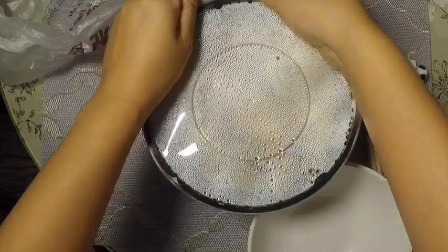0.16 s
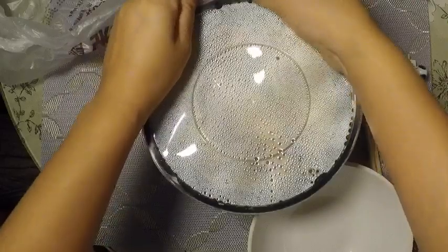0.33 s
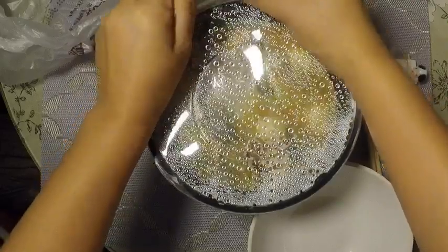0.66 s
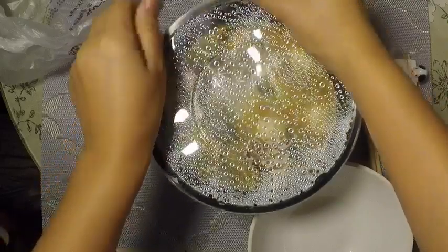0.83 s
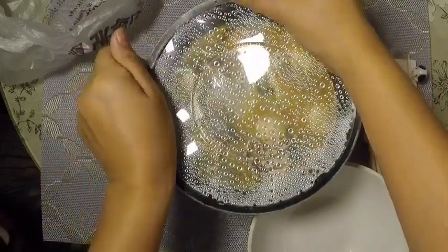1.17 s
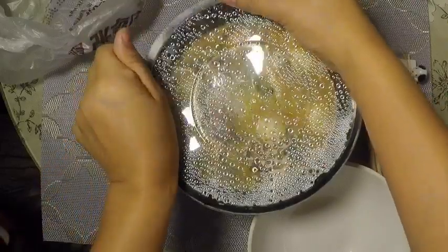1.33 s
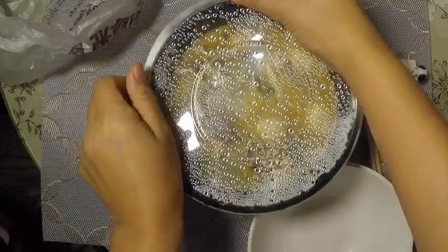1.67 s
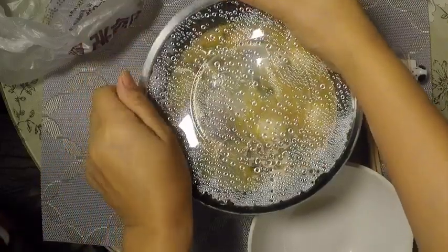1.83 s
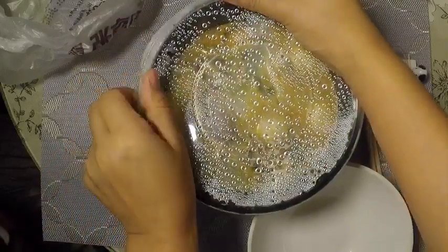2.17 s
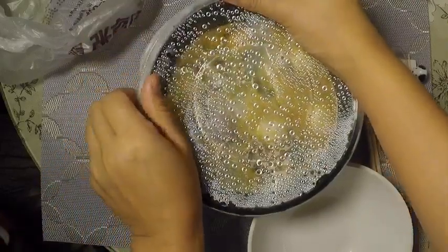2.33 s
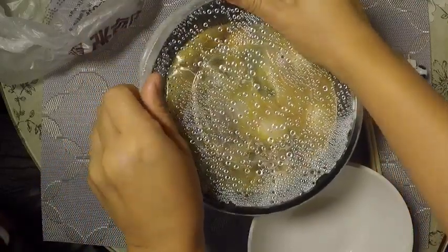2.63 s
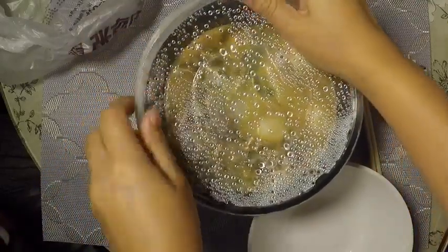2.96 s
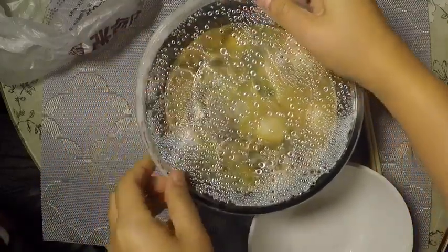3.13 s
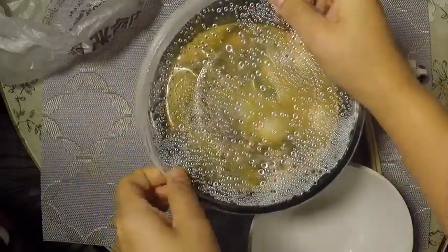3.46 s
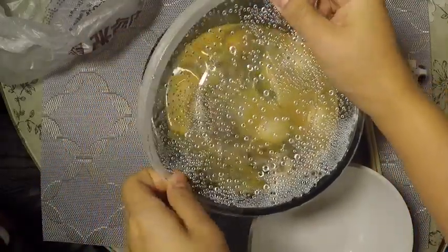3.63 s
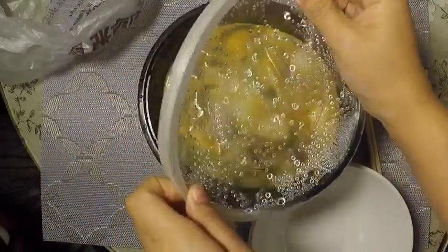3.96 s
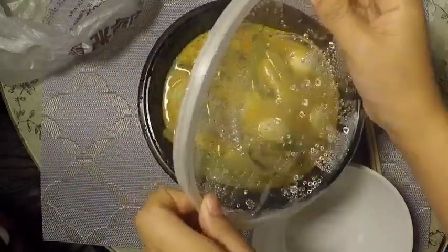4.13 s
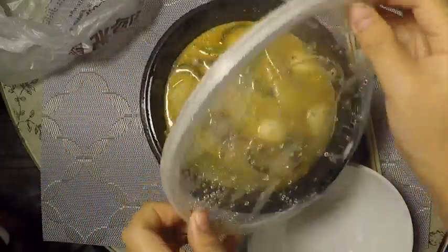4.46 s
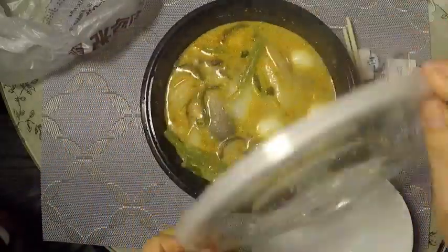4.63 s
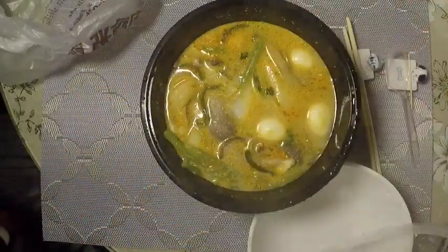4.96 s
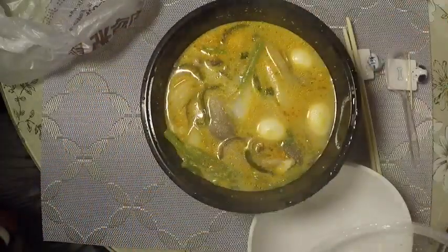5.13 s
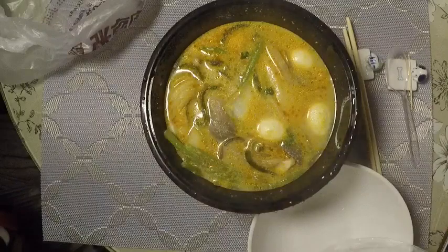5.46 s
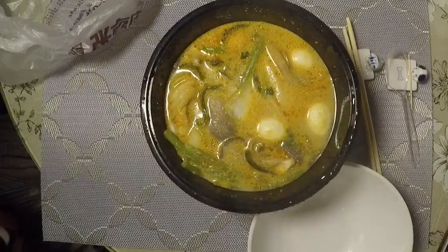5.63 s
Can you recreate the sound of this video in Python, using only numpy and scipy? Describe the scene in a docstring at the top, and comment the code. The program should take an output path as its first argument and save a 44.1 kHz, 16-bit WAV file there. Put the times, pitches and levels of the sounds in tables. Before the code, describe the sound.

Close to a stereo microphone indoors, a plastic lid pops and crinkles as it is pried from the rim of a soup bowl. Scattered cracks grow into denser, hollower clusters mixed with short creaks, until the lid comes free with a few last loud snaps. It then touches a china dish several times with a light ring. A low pulsing hum and faint room noise continue underneath.

```python
"""A room, with a small stereo microphone close to a soup bowl whose thin plastic lid is worked off.
The lip lets go of the rim in snaps and stick-slip creaks that ring in the lid and in the air under it,
and the bent sheet crackles between them. At the end the lid touches a china dish, which rings on.
Behind the close sound lie a short room tail, a low throbbing hum and faint room noise."""
import sys
import numpy as np
from scipy import signal
from scipy.fft import rfft, irfft, next_fast_len
from scipy.io import wavfile

SR = 44100
rng = np.random.default_rng(int(sys.argv[2]) if len(sys.argv) > 2 else 0)


def transcribe(u):
    """Save the signal u as a 16-bit wav file named by the first command-line argument.

    u: samples, shape (n,) or (channels, n), limited to [-1, 1]; the rate is SR.
    q: integer samples, one column per channel.
    """
    v = np.clip(np.atleast_2d(u).T, -1, 1)
    q = np.round(v * 32767).astype(np.int16)
    wavfile.write(sys.argv[1], SR, q)


N = 255339

# Hum and room noise: (frequency [Hz], relative level per Hz [dB])
ROOM_TONE = [(76, -55), (130, -1), (233, -13.5), (472, -20), (501, -21), (735, -18), (1370, -23.5),
             (3750, -38.5), (8920, -35), (14500, -49), (15400, -70)]
# Diffuse sound at the microphone: (frequency [Hz], left-right correlation [-1 to 1])
DIFFUSE_LIKENESS = [(60, 0.82), (130, 0.98), (290, -0.11), (640, -0.66), (1410, -0.61), (3100, 0.57),
                    (6820, 0.1), (15000, -0.42)]
# Decay of the room tail: (frequency [Hz], t60 [s])
ROOM_DECAY = [(150, 0.28), (600, 0.37), (2000, 0.29), (6000, 0.26), (12000, 0.16)]
# Colour of the room tail: (frequency [Hz], relative level [dB])
ROOM_COLOUR = [(150, -7), (600, -11), (2000, -8), (4200, -10.5), (6000, -6), (8500, -2), (12000, -2)]
# Close sound at the microphone's two ports: (frequency [Hz], left lead [rad])
PORT_LEAD = [(0, 0), (260, -.1), (950, -1.8), (1640, .7), (2500, -.9), (4000, .4), (6370, 1.0),
             (8960, -1.8), (16000, -2.2)]
# Its lean to one side, which ports() scales down: (frequency [Hz], unscaled left over right [dB])
PORT_BALANCE = [(60, -12), (110, 20), (200, -2.5), (380, 4.5), (700, 9.5), (1290, -11), (2380, 2),
                (4400, -2), (8120, 3), (15000, -9)]
# Colour of the close sound, lifted near 2.5 kHz and dipped near 4 kHz: (frequency [Hz], gain [dB])
CLOSE_COLOUR = [(1600, -1), (2500, 1), (3300, -0.5), (4200, -1), (5200, 0.5), (8000, 0.5), (13000, -3),
                (16500, -14)]
# Modes of the china dish, the bowl and the trapped air: (frequency [Hz], level [dB], t60 [s])
DISH_MODES = [(2234, 4, 0.29), (2250, -4, 0.41), (3650, -11, .3), (6008, -6, 0.25), (8360, -16, .22)]
THUD_MODES = [(189.4, -3, 0.045), (260, 5, 0.022), (367, 0.5, 0.017), (463, 5.5, 0.013)]
AIR_MODES = [(667, -4.5, 0.016), (796, 5, 0.023), (929, 0, 0.009), (1030, 2, 0.0098)]
# Modes of the lid's sheet, its bright crack and its thin edge: (frequency [Hz], level [dB])
SHEET_MODES = [(1150, 2.5), (1350, -2), (1550, 7), (1850, 8), (2250, 6), (2700, 6.5), (3100, 4)]
CRACK_MODES = [(3550, 0.5), (4300, 5), (5000, 7.5), (5700, 11), (6500, 9.5), (7400, 3), (8400, -3.5)]
EDGE_MODES = [(8700, -3), (10500, 37), (12500, -18), (14500, -35)]
# Lid touching the dish: (time [s], level [dB], china ring [relative dB])
TAPS = [(5.0772, -64, -22), (5.2746, -37.5, -13.5), (5.4914, -21, -15), (5.563, -48, -36),
        (5.6655, -33.5, -14)]
# Crackle as the fingers bend the sheet: (time [s], level [dB])
FLEX = [(0.1, -80), (0.41, -57), (0.77, -70), (0.96, -98), (1.19, -55), (1.57, -56), (1.87, -65.5),
        (2.37, -61), (2.62, -57), (3.01, -60.5), (3.74, -60.5), (3.92, -50), (4.11, -44.5), (4.44, -92),
        (4.6, -64), (4.7, -85)]
# Lip dragging on the rim: (start [s], end [s], first rate [slips/s], last rate [slips/s],
# level [dB], trapped air [relative dB], crack [relative dB])
CREAKS = [(2.952, 2.973, 405, 436, -24.5, -6, -15.5), (2.968, 3.024, 198, 173, -22.5, 3.5, -9),
          (3.265, 3.315, 450, 187, -27.5, 8.5, -16), (3.397, 3.427, 290, 270, -26.5, 10.5, -11),
          (4.126, 4.169, 120, 340, -29, 4, 3.5)]
# Single snaps of the lip: (time [s], sheet level [dB], thud [relative dB],
# trapped air [relative dB], crack [relative dB], fold pitch [Hz])
SNAPS = [(0.1259, -43, 1, -17, 6, 6160), (0.1351, -14, -23, -19, 8, 1890), (0.1015, -55, -20, -16, 9, 4470),
         (0.3115, -37.5, -15, -15, -3, 1800), (0.32, -44, -20, -24, 16, 5850),
         (0.3336, -24.5, -32, -30, 11, 6340), (0.3641, -10, -17, -17, 2, 1540),
         (0.3744, -41.5, -15, -30, 23.5, 6900), (0.4371, -36, 16.5, 10, -20, 1190),
         (0.4459, -20, 2, -12, -13, 1570), (0.4683, -5.5, -2, -13, -5.5, 1150),
         (0.5836, -31.5, -5.5, -23, -4.5, 1890), (0.7035, -43, -4, -15, 4, 2200),
         (0.7123, -28, -11, -27, -6, 2260), (0.7267, -33, 4.5, -30, 6.5, 1700),
         (0.8245, -32, -34, -24, -7, 1640), (1.058, -29, -31, -3, -11, 1430),
         (1.0824, -37.5, -26, -25.5, 6, 4600), (1.1054, -32.5, -31, -23.5, 0, 6400),
         (1.1702, -17.5, -31, -43, 10, 6160), (1.2765, -35.5, -25, -18, -14, 1100),
         (1.3163, -22, -25, -20, -3, 1390), (1.3189, -7, -12.5, -21, 4, 1850),
         (1.4336, -25.5, -7, -13, 6.5, 2710), (1.5429, -42.5, -32, 1, 22.5, 3600),
         (1.6023, -40, -28, -30, 24, 3600), (1.6546, -37, -35, -31, 24, 3700),
         (1.7715, -40, -20, -14, -10, 1500), (1.859, -40, -25, -20, 2, 4600),
         (1.8721, -37, -31, -19, 6, 5600), (2.3685, -16.5, -48, -12.5, -5.5, 1390),
         (2.4528, -34, -33, -25, 9, 5200), (2.4838, -21, -38, 1.5, 3.5, 1530),
         (2.519, -42, -6, -14, 8, 6100), (2.5466, -22, -29, 5.5, 2.5, 1190),
         (2.5567, -20.5, -24, -10, -12, 1110), (2.6738, -18.5, -33, 3.5, 0, 6100),
         (2.6998, -26.5, -34, 2.5, -1, 1570), (2.7167, -13, -33, -5.5, -2, 1100),
         (2.8384, -27.5, -12, -2, -2, 1590), (3.0195, -22, -9, -37, -8.5, 1300),
         (3.1627, -31.5, -27, -1, -9, 1430), (3.1754, -32, -23, 4.5, -8, 1920),
         (3.244, -25.5, -16, 1, 1.5, 1650), (3.3737, -19.5, -43, -16, -6, 2450),
         (3.3752, -22.5, -41, -12, -5, 2640), (3.3884, -31, -11, 8, -22, 1220),
         (3.5259, -20, -24, -1.5, -11, 1990), (3.7289, -22.5, -17, 2, -23, 1450),
         (3.7659, -20, -30, 2.5, -7, 1730), (3.7785, -22.5, -30, 7.5, -16, 1050),
         (3.7893, -11, -37, -3.5, -3.5, 1950), (3.9025, -19.5, -16, 1.5, -1, 1100),
         (3.9177, -26.5, -14, -22, 1, 1740), (3.9414, -21.5, -34, 0, -7.5, 1940),
         (3.9674, -19, -8, -3, -2, 1060), (3.9794, -19.5, -11.5, -5, 1.5, 1200),
         (3.996, -30, -20, -7, -15, 1100), (4.035, -30, -8, -3, -5, 1500), (4.122, -27, -25, 9, -4, 1880),
         (4.131, -28, -13, 1, 3, 1100), (4.140, -21, -19, -1, 4.5, 1560), (4.1011, -19, -15, -29, 1, 1500),
         (4.2238, -26, -35, -1.5, -2, 1230), (4.2857, -9, -43, -12, -2.5, 1196),
         (4.2934, -14, -55, -3, 2.5, 2000), (4.3045, -20.5, -43, -23, -30, 1110),
         (4.4897, -7, -29, -4, -4, 1980), (4.5225, -10.5, -26, -24, -3, 1390),
         (4.5256, -13.5, -14, -15, 1.5, 1080)]
# Runs of small snaps: (start [s], end [s], rate [snaps/s], last gap over first [ratio],
# first level [dB], last level [dB], then thud, trapped air, crack and fold pitch as in SNAPS)
SNAP_RUNS = [(0.934, 1.046, 73, 2.1, -39.5, -30, -21, -9, -3.5, 1460),
             (1.679, 1.727, 45, 3.2, -34.5, -44.5, -27, -7, 8.5, 3560),
             (2.5695, 2.615, 89, 0.95, -12, -29, -37.5, 2.5, 0, 1080),
             (2.736, 2.808, 68, 1.17, -31.5, -34.5, -19, 7, 7.5, 1700),
             (3.2593, 3.32, 67, 0.89, -29, -40, -38, 6.5, 1, 1360),
             (3.432, 3.5144, 90, 0.73, -29.5, -36.5, -23, 6, -0.5, 1350),
             (3.56, 3.579, 62, 1.02, -45, -43, 4, 14, -12, 1090),
             (3.6568, 3.701, 44, 0.91, -27.5, -27.5, -23, -0.5, -5.5, 1160),
             (3.744, 3.754, 110, 1, -26.5, -32.5, -35, -0.5, -0.5, 1770),
             (3.851, 3.878, 67, 1.3, -40.5, -30.5, -11, 7, 1.5, 1330),
             (4.0046, 4.019, 104, 1.21, -21, -17.5, -12, -1.5, -1, 1200),
             (4.054, 4.077, 91, 2.2, -21, -12.5, -14, 0, -3.5, 1120),
             (4.1495, 4.168, 108, 1.1, -15, -21, -45, -1, -12, 1710),
             (4.4265, 4.482, 76, 1.04, -34.5, -21.5, -6, -7, -5.5, 1870)]


def from_db(db):
    """Decibels to gain."""
    return 10 ** (np.asarray(db) / 20)


def rms_one(x):
    """Scale to unit rms."""
    return x / np.sqrt(np.mean(x ** 2) + 1e-20)


def at_hz(points, hz):
    """Read a spectrum on a log frequency axis."""
    freqs, values = np.array(points, float).T
    return np.interp(np.log(hz + 1), np.log(freqs + 1), values)


def add(out, s, sound):
    """Mix a sound in at s seconds."""
    i = round(s * SR)
    out[..., i:i + sound.shape[-1]] += sound[..., :N - i]


def filtered(x, hz, kind, order=2):
    """Butterworth filter."""
    return signal.sosfilt(signal.butter(order, hz, kind, fs=SR, output="sos"), x)


def die_away(pulses, t60):
    """Give each pulse an exponential tail."""
    return signal.lfilter([1], [1, -from_db(-60 / (t60 * SR))], pulses + 1e-18)


def plastic(modes, cycles=9):
    """Soft plastic loses 60 dB in a set number of cycles, whatever the pitch."""
    return [(hz, db, cycles / hz) for hz, db in modes]


def ring(drive, modes):
    """A force rings damped modes, neighbours in opposite sign."""
    out = 0
    for k, (hz, db, t60) in enumerate(modes):
        radius, angle = from_db(-60 / (t60 * SR)), 2 * np.pi * hz / SR
        gain = (-1) ** k * from_db(db) * np.sin(angle)
        poles = [1, -2 * radius * np.cos(angle), radius ** 2]
        out = out + signal.lfilter([0, gain], poles, drive + 1e-18)
    return out / np.sqrt(len(modes))


def burst(modes, rattle_db=-20, kick_db=0, tear_s=0.0013, bend=0.06):
    """A kick, a short ragged tear and a weaker rattle drive modes detuned by bending; peak 1."""
    rise_s, rattle_s = 0.00015, 0.038
    t = np.arange(3000) / SR
    envelope = from_db(-60 * t / tear_s) + from_db(rattle_db - 60 * t / rattle_s)
    envelope *= 1 - np.exp(-t / rise_s)
    force = envelope * rng.standard_normal(len(t)) - from_db(kick_db) * (t == 0)
    out = 0
    for k, (hz, db, t60) in enumerate(modes):
        bent_hz = hz * (1 + bend * rng.uniform(-1, 1))
        out = out + from_db(db) * np.sqrt(t60) * (-1) ** k * rms_one(ring(force, [(bent_hz, 0, t60)]))
    return out / np.abs(out).max()


def diffuse(spectrum, size, decays=None):
    """Noise from all sides: third-octave bands with their own level, stereo width and decay; rms 1."""
    out, edges = 0, 20 * 2 ** np.arange(0, 9.8, 1 / 3)
    white, t = rng.standard_normal((2, 2, size)), np.arange(size) / SR
    for k, (low, high) in enumerate(zip(edges, edges[1:])):
        mid, side = filtered(white[k % 2], [low, high], "band")
        hz = np.sqrt(low * high)
        alike = at_hz(DIFFUSE_LIKENESS, hz)
        stereo = np.sqrt(1 + alike) * mid + np.sqrt(1 - alike) * side * [[1], [-1]]
        fade = from_db(-60 * t / at_hz(decays, hz)) if decays else 1
        out = out + from_db(at_hz(spectrum, hz)) * fade * stereo
    return rms_one(out)


def room_tone(level_db=-47, throb_s=0.1025, crest_at_s=4.97, throb_db=4.5, throb_top_hz=370):
    """Steady background noise whose low hum throbs like a slow fan."""
    noise = from_db(level_db) * diffuse(ROOM_TONE, N + 8000)[:, 8000:]
    hum = filtered(noise, throb_top_hz, "low")
    turn = 2 * np.pi * (np.arange(N) / SR - crest_at_s) / throb_s
    return noise + hum * (from_db(throb_db * np.cos(turn)) - 1)


def room_tail(close, level_db=-4.5, gap_s=0.0015, rise_s=0.0006, shift_s=0.11, patterns=5):
    """Reflections build after a short gap and die band by band; the pattern shifts as the hands move."""
    out, size = 0, 16000
    rise = 1 - np.exp(-np.arange(size) / SR / rise_s)
    late = np.pad(close, (round(gap_s * SR), 0))
    position = np.arange(len(late)) / SR / shift_s
    for k in range(patterns):
        offset = (position - k + patterns / 2) % patterns - patterns / 2
        crossfade = np.sqrt(np.clip(1 - np.abs(offset), 0, 1))
        echoes = rise * diffuse(ROOM_COLOUR, size, ROOM_DECAY) / np.sqrt(size)
        out = out + signal.fftconvolve((crossfade * late)[None], echoes, axes=1)[:, :N]
    return from_db(level_db) * out


def ports(close, lean_per_side=0.41):
    """Close sound reaches the microphone's two ports with phase and level offsets that vary by pitch."""
    size = next_fast_len(N + 4096)
    hz = np.arange(size // 2 + 1) * SR / size
    left = from_db(lean_per_side * at_hz(PORT_BALANCE, hz)) * np.exp(0.5j * at_hz(PORT_LEAD, hz))
    return irfft(rfft(close, size) * [left, 1 / left], size)[:, :N]


def dish_taps():
    """The lid ticks lightly against the dish, and the china rings on."""
    ticks, strikes = np.zeros((2, N))
    for s, db, ring_db in TAPS:
        tick = burst(plastic(SHEET_MODES[2:])) + from_db(-4.5) * burst(plastic(CRACK_MODES))
        tick += from_db(-7) * burst(plastic(EDGE_MODES))
        add(ticks, s, from_db(db) * tick)
        strikes[round(s * SR)] = from_db(db + ring_db)
    return ticks + ring(strikes, DISH_MODES)


def crackle(releases, per_s=1500, spread_db=3, gap_opens_s=2.5, settle_db=-31.5):
    """Tiny buckles of the bent sheet, stirred by fingers and snaps; hollower once the gap opens."""
    t, jolts = np.arange(N) / SR, np.zeros(N)
    buckles = rng.random(N) < per_s / SR
    sizes = from_db(spread_db * np.minimum(rng.exponential(1, N), 4))
    grains = buckles * sizes * rng.choice([-1, 1], N)
    bright = rms_one(ring(grains, plastic(SHEET_MODES)) + from_db(3) * ring(grains, plastic(CRACK_MODES)))
    hollow = rms_one(ring(grains, AIR_MODES)) * from_db(np.where(t < gap_opens_s, -46, 0.5))
    for s, db, *_ in releases:
        jolts[round(s * SR)] = from_db(db + settle_db)
    flex_s, flex_db = np.transpose(FLEX)
    fingers = from_db(np.interp(t, flex_s, flex_db, -120, -120))
    return (fingers + die_away(jolts, t60=0.12)) * (bright + hollow)


def creaks(jitter=0.04, spread_db=2, rasp_db=-9.5, radiates_above_hz=580):
    """The lip sticks and slips at a gliding, slightly uneven rate; each slip drags a short rasp."""
    sheet, air, crack = np.zeros((3, N))
    for start, end, first_rate, last_rate, db, air_db, crack_db in CREAKS:
        onset = round(start * SR)
        slip_count = np.cumsum(np.geomspace(first_rate, last_rate, round(end * SR) - onset)) / SR
        slips = onset + np.flatnonzero(np.diff(np.floor(slip_count)))
        timing, strength = rng.standard_normal((100, 2))[:len(slips)].T
        slips += np.round(jitter * SR / last_rate * timing).astype(int)
        force = from_db(db + spread_db * strength)
        sheet[slips], air[slips], crack[slips] = force, force * from_db(air_db), force * from_db(crack_db)
    rasp = from_db(rasp_db) * die_away(crack, t60=0.035) * rng.standard_normal(N)
    body = ring(sheet, plastic(SHEET_MODES[:3])) + from_db(-16) * ring(sheet, plastic(SHEET_MODES[3:]))
    bright = ring(crack + rasp, plastic(CRACK_MODES))
    return filtered(body + ring(air, AIR_MODES) + bright, radiates_above_hz, "high")


def unzipping(jitter_s=0.00066):
    """The lip unzips along the rim in runs of snaps with a gliding gap; rows as in SNAPS."""
    rows = []
    for start, end, per_s, stretch, first_db, last_db, *colour in SNAP_RUNS:
        gaps = np.geomspace(1, stretch, max(round((end - start) * per_s), 1))
        along = np.append(0, np.cumsum(gaps)) / gaps.sum()
        times = start + (end - start) * along + jitter_s * rng.standard_normal(80)[::2][:len(along)]
        levels = first_db + (last_db - first_db) * along
        rows += [(s, db, *colour) for s, db in zip(times, levels)]
    return rows


def snaps(releases, lid_rises_s=3.536, pitch_rise_per_s=0.32, edge_db_per_s=11.5, fold_t60_s=0.015):
    """Each snap jolts bowl, trapped air and lid; the fold that gave way adds its own pitch."""
    out = np.zeros(N)
    for s, db, thud_db, air_db, crack_db, fold_hz in releases:
        # As the lid rises the opening widens, so bowl and trapped air sound higher.
        lifted_s = max(s - lid_rises_s, 0)
        rise = 1 + pitch_rise_per_s * lifted_s
        thud_modes = [(hz * rise, level, t60) for hz, level, t60 in THUD_MODES]
        air_modes = [(hz * rise, level, t60) for hz, level, t60 in AIR_MODES]
        fold_db = crack_db - 6.5 if fold_hz > SHEET_MODES[-1][0] else -1.5   # high folds follow the crack
        fold = from_db(fold_db) * burst([(fold_hz, 0, fold_t60_s)], bend=0, rattle_db=-26.5)
        thud = from_db(thud_db) * burst(thud_modes, kick_db=7.5)
        air = from_db(air_db) * burst(air_modes, kick_db=7, bend=0.014, rattle_db=-21.5)
        sheet = burst(plastic(SHEET_MODES))
        crack = from_db(crack_db) * burst(plastic(CRACK_MODES), tear_s=0.0088)
        # The thin edge speaks in hard, bright snaps, and more as it turns to the microphone.
        edge_db = -10 + 0.78 * db + max(crack_db, 0) + edge_db_per_s * lifted_s
        edge = from_db(edge_db) * burst(plastic(EDGE_MODES), rattle_db=-38)
        add(out, s, from_db(db) * (fold + thud + air + sheet + crack + edge))
    return out


def scene():
    """Lid and dish close to the microphone, with the room tail and room tone behind them."""
    releases = SNAPS + unzipping()
    vibration = snaps(releases) + creaks() + crackle(releases) + dish_taps()
    size = next_fast_len(N)
    hz = np.arange(size // 2 + 1) * SR / size
    close = irfft(rfft(vibration, size) * from_db(at_hz(CLOSE_COLOUR, hz)), size)[:N]
    return ports(close) + room_tail(close) + room_tone()


def record(dry, low_stop_hz=110.77, high_stop_hz=16700, rumble_db=-68.5, overload=0.93):
    """The microphone: a steep low cut, its own faint rumble, clipping at overload, a steep top cut."""
    low_cut = signal.cheby2(8, 45, low_stop_hz, "high", fs=SR, output="sos")
    top_cut = signal.cheby2(16, 70, high_stop_hz, fs=SR, output="sos")
    white = rng.standard_normal(N) + 0.56 * rng.standard_normal((2, N))   # mostly alike on both sides
    rumble = from_db(rumble_db) * rms_one(filtered(white, [18, 90], "band", order=1))
    clipped = np.clip(signal.sosfilt(low_cut, dry) + rumble, -overload, overload)
    return signal.sosfilt(top_cut, clipped)


dry = scene()
out = record(dry)
transcribe(out)
```